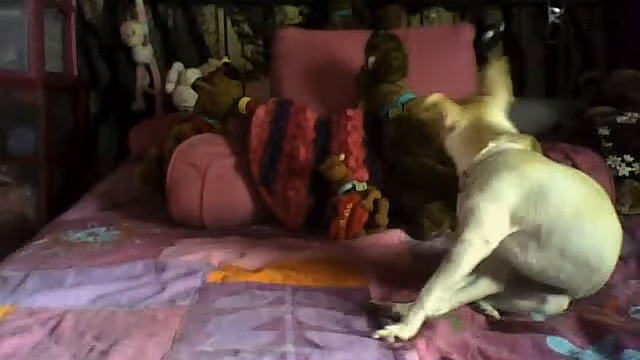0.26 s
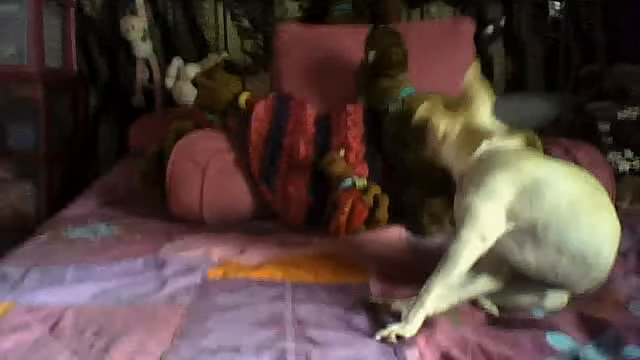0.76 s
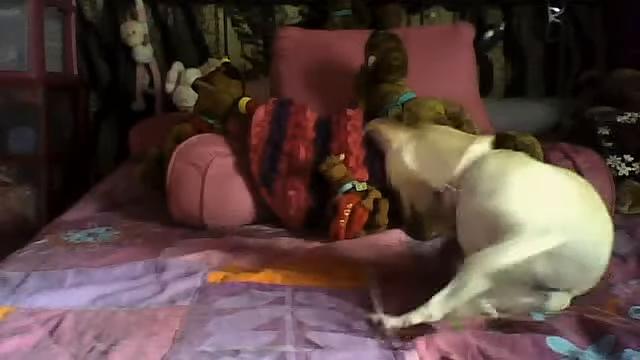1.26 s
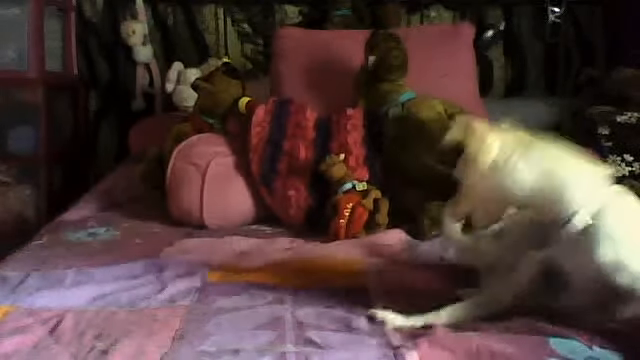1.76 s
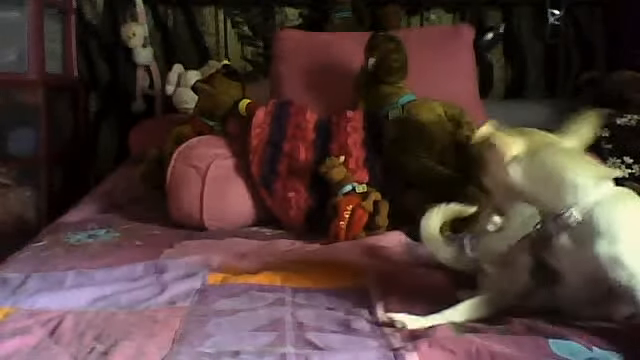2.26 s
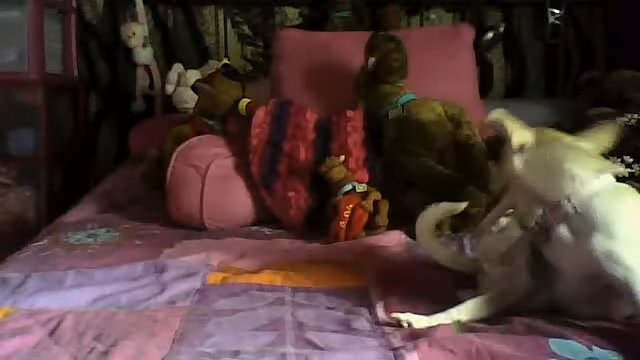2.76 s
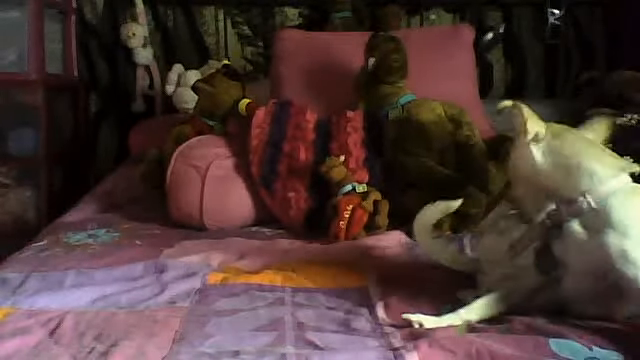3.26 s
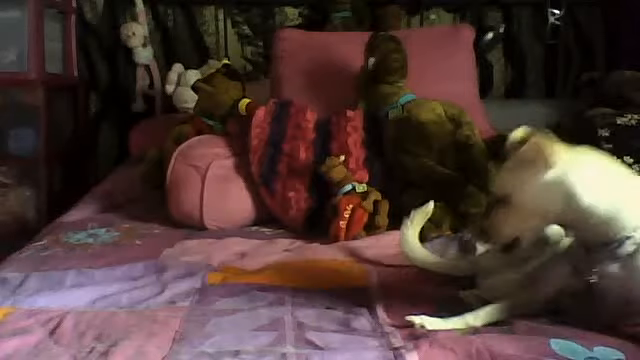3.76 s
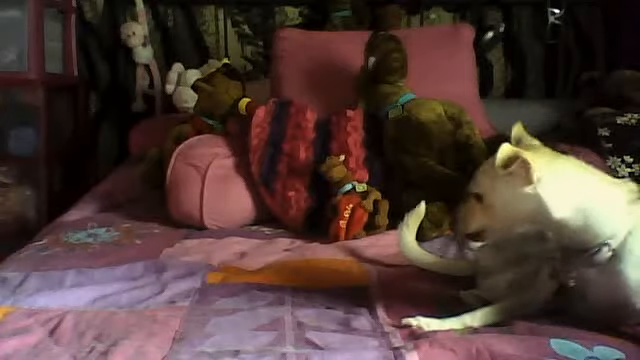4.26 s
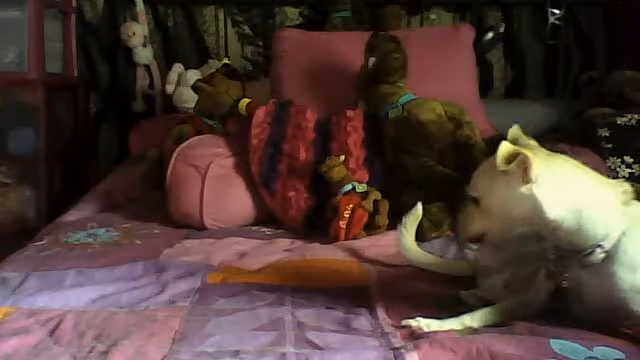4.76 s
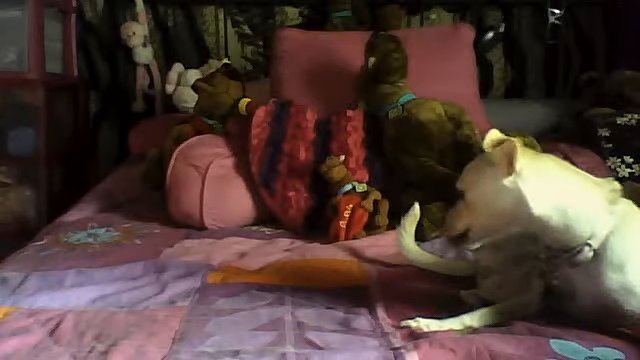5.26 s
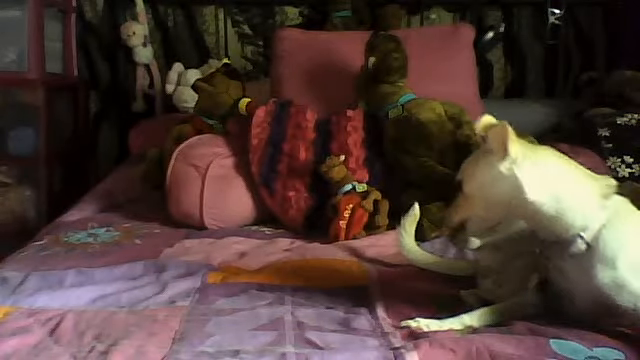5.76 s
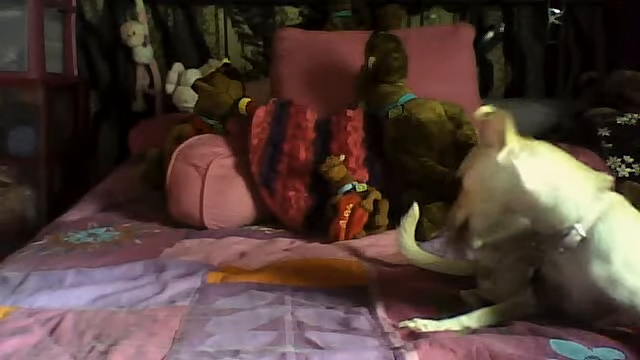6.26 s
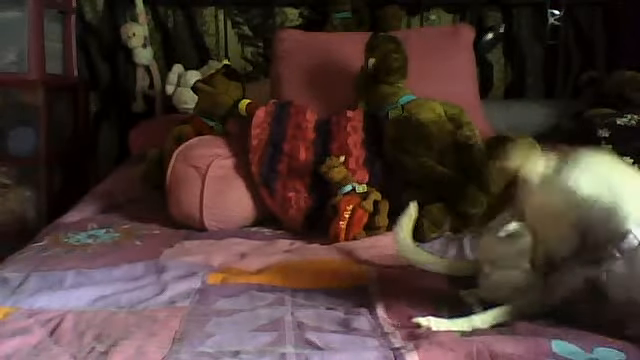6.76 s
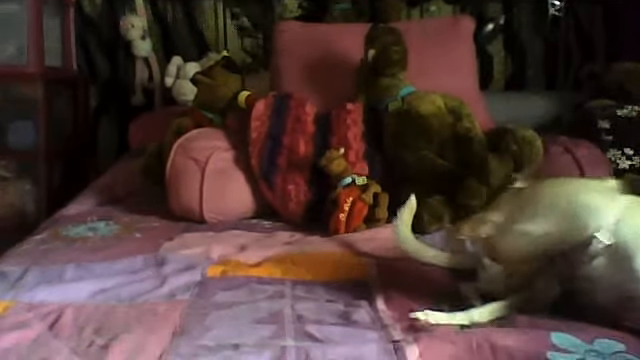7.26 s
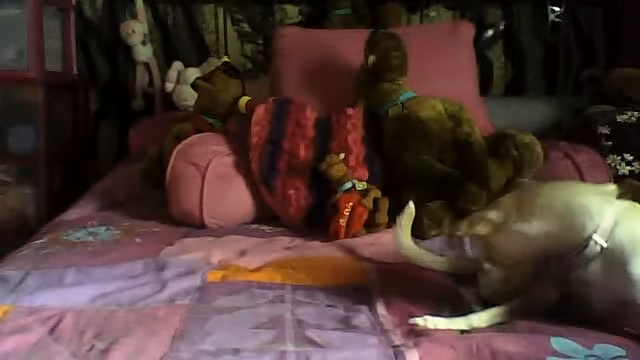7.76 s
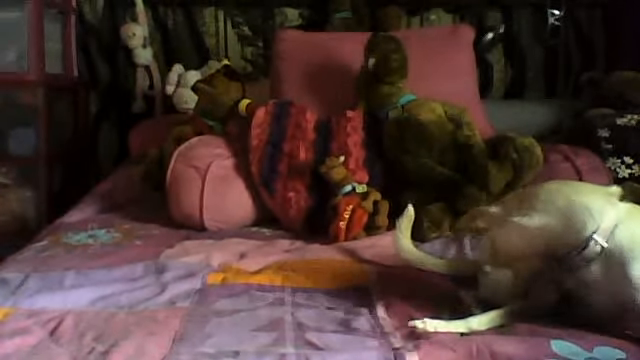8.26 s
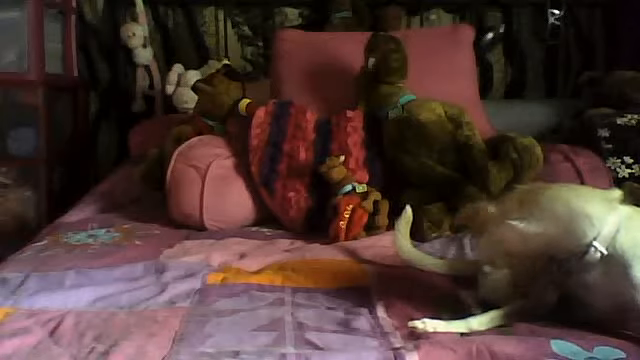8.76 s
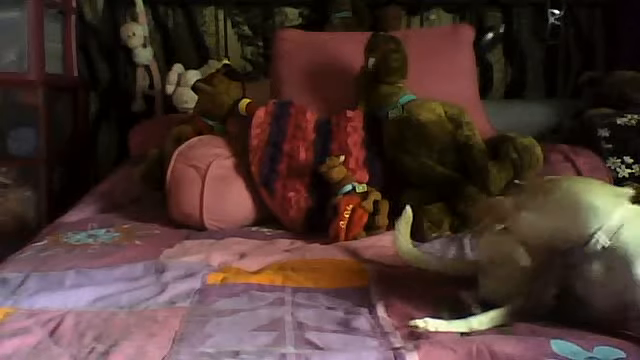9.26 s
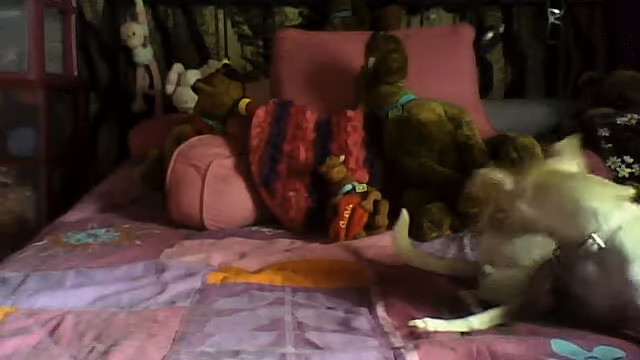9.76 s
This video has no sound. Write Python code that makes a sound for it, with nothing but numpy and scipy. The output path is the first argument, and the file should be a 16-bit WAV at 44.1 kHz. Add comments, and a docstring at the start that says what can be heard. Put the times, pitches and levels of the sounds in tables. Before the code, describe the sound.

Two mouse clicks, each a sharp press and a softer release, knock through a desk into the microphone. A computer's low hum and fluttering fan whine carry on indoors, along with hiss, static ticks and quick little bursts of electrical crackle. Very faint, muffled thuds come and go as a dog moves on a bed. A third click comes past the middle, and the computer runs on.

```python
"""From the start a computer sounds over the hiss and rumble at its desk microphone: its disk hums, its fan
whines, and data packets crackle in the microphone lead, about seven a second, among ticks of static.
In the first second and a half, two mouse clicks, press and release, knock through the desk top.
Then a dog shifts about almost silently on a bed, on and off until the end.
Near seven seconds comes a third click. The computer, the loud thing in the room, runs on."""
import sys
import numpy as np
from scipy import signal
from scipy.fft import rfft, irfft
from scipy.io import wavfile

SR = 44100
rng = np.random.default_rng(int(sys.argv[2]) if len(sys.argv) > 2 else 0)


def dump(signal):
    """Clip the signal to [-1, 1] and save it as 16-bit WAV at the path in sys.argv[1]."""
    limited = np.clip(np.atleast_2d(signal).T, -1, 1)
    pcm = np.round(limited * 32767).astype(np.int16)
    wavfile.write(sys.argv[1], SR, pcm)


N = 441000
TIME, FREQS = np.arange(N) / SR, np.fft.rfftfreq(N, 1 / SR)

# microphone hiss and room air: (frequency [Hz], spectral density [dB per Hz])
HISS_SPECTRUM = [(50, -62), (90, -65.5), (140, -70), (200, -76.5), (350, -82.5), (750, -86), (1300, -84.5),
                 (2000, -87.5), (4500, -89), (7700, -90), (9200, -91.5), (10300, -92.5)]
# swell of the air rumble: (time [s], relative level [dB])
RUMBLE_SWELL = [(0, -36.5), (.44, -34.5), (.58, -25.5), (.97, -35), (1.25, -25), (1.5, -36.5), (2.6, -32.5),
                (4.5, -34.5), (6.2, -35), (6.7, -33), (7.4, -37.5), (8.2, -30.5), (10, -39.5)]
# colour of the rumble: (frequency [Hz], gain [dB])
RUMBLE_SPECTRUM = [(3, -1.5), (16, 4), (29, -25.5), (50, -25), (90, -35.5), (200, -54), (1000, -100)]
# the dog's weight on the mattress: (centre time [s], length [s], level [dB], pitch [Hz])
DOG_NUDGES = [(1.766, 0.066, -39.5, 124), (2.215, 0.047, -40.5, 188), (2.443, 0.098, -46, 207),
              (3.597, 0.083, -37, 139), (4.696, 0.17, -50, 175), (4.92, 0.056, -43.5, 170),
              (6.258, 0.12, -47, 130), (7.27, 0.18, -48, 190), (7.89, 0.042, -46, 168),
              (8.305, .3, -57, 160), (8.69, 0.093, -47, 130), (9.476, 0.43, -49, 133),
              (9.917, 0.22, -51, 127)]
# ticks of static: (time [s], level [dB])
STATIC_TICKS = [(0.7776, -16), (1.1545, -14.5), (2.4568, -11.5), (3.0625, -6.5), (4.2561, -6.5),
                (5.69, -12.5), (6.8602, -12), (7.2521, -6), (7.7024, -4.5), (9.3587, -13)]
# mouse button, sharp press then soft release: (time [s], gain [dB], cutoff [Hz], bare switch click [dB])
BUTTON_SNAPS = [(0.2215, -1, 3700, -14), (0.3976, 1, 1430, -23), (1.2522, -1, 3670, -10),
                (1.4160, 1, 1390, -30), (6.964, 0, 3780, -11.5), (7.1479, 1, 1540, -29)]
# resonances of the desk and microphone stand: (frequency [Hz], width [Hz], gain [dB])
DESK_MODES = [(81, 20, 22), (118, 15.6, 31), (141.4, 26, 29.5), (188, 79, 10.5), (248, 31, 22),
              (312, 15, 20.5), (390, 96, 16.5), (525, 63, 26.5), (710, 55, 18), (916, 52, 19),
              (1265, 194, 17.5), (1805, 200, 14.5), (2384, 180, 15), (3300, 770, 9)]
# travel time of a knock through the desk: (frequency [Hz], group delay [s])
DESK_DELAY = [(60, 0.00844), (140, 0.00725), (300, .005), (540, .0045), (750, 0.0032), (1200, 0.00054),
              (2300, 0.0026), (3200, 0.0011), (6000, 0.0032)]
# long data packets, all at one voltage, so the longer sounds the louder: (time [s], length [s])
LONG_PACKETS = [(0.007, 0.0075), (0.155, 0.0061), (0.451, 0.0042), (0.57, 0.0045), (0.836, 0.014),
                (0.89, 0.006), (0.907, 0.0051), (0.967, 0.0041), (1.126, 0.0056), (1.344, 0.0119),
                (1.601, 0.0041), (1.88, 0.0046), (2.03, 0.0113), (2.148, 0.004), (2.403, 0.0055),
                (2.554, 0.0053), (2.828, 0.0105), (3.116, 0.0037), (3.416, 0.0091), (3.735, 0.0069),
                (3.864, 0.0096), (4.014, 0.0035), (4.299, 0.0075), (4.566, 0.0049), (4.699, 0.01),
                (5.086, 0.0068), (5.304, 0.0105), (5.611, 0.0044), (5.707, 0.0048), (5.85, 0.0096),
                (5.984, 0.0058), (6.111, 0.0052), (6.245, 0.0084), (6.545, 0.0061), (6.763, 0.0059),
                (6.907, 0.0163), (7.339, 0.0057), (7.465, 0.0074), (7.572, 0.006), (7.862, 0.006),
                (8.142, 0.01), (8.236, 0.0063), (8.376, 0.006), (8.543, 0.0078), (8.689, 0.0052),
                (9.103, 0.0067), (9.319, 0.0054), (9.479, 0.0032), (9.632, 0.0105), (9.768, 0.0054),
                (9.958, 0.0032)]
# colour of the interference: (frequency [Hz], gain [dB])
INTERFERENCE_SPECTRUM = [(100, 11), (400, 3), (1000, 1), (2000, -4.5), (3000, 2.5), (3550, 0), (3800, -5),
                         (5100, -7.5), (5800, 1.5), (6900, 4.5), (7250, -4), (11000, -3.5)]
# hum of the spinning disk and the mains: (frequency [Hz], rms level [dB])
HUM_LINES = [(89.96, -37), (64, -71), (104.5, -53.5), (121.8, -58.5), (173, -70), (1270, -67.5)]
# tones of the fan: (frequency [Hz], rms pitch wander [Hz], relative level [dB])
FAN_LINES = [(899, 9.94, 1.5), (937, 6.9, -2.5), (955.5, 6.99, 1.5), (992, 24, -8.5), (1034, 8.98, -5),
             (1212, 30, -8.5)]
# response of the sound input: (frequency [Hz], gain [dB])
INPUT_RESPONSE = [(8000, 1), (9300, -2), (10600, -8), (11000, -29), (12000, -17)]


def gain_of(db):
    """Amplitude ratio: a factor of ten for every 20 dB."""
    return 10 ** (np.asarray(db) / 20)


def unit_rms(x):
    """Normalisation to a mean square of 1."""
    return x / np.sqrt(np.mean(x ** 2) + 1e-20)


def curve_at(points, f):
    """Interpolation of (frequency, value) points on a logarithmic frequency axis."""
    hz, value = np.transpose(points)
    return np.interp(np.log(f + 1), np.log(hz + 1), value)


def coloured(x, points):
    """Zero-phase filtering by a curve of (frequency [Hz], gain [dB])."""
    return irfft(rfft(x) * gain_of(curve_at(points, FREQS)), N)


def resonance(f, hz, width):
    """Lorentzian gain curve, 1 at its centre."""
    return 1 / (1 + ((f - hz) / (width * np.pi / 4)) ** 2)


def band_noise(hz, width):
    """White noise filtered by one resonance, rms 1."""
    return unit_rms(irfft(rfft(rng.standard_normal(N)) * resonance(FREQS, hz, width), N))


def add(mix, s, sound):
    """Superposition of a sound on the mix at time s."""
    part = mix[max(round(s * SR), 0):][:len(sound)]
    part += sound[:len(part)]


def noise_floor(rumble_db=8):
    """Stationary hiss lies over a deep air rumble under slow amplitude modulation."""
    hiss = coloured(rng.standard_normal(N) * np.sqrt(SR / 2), HISS_SPECTRUM)
    rumble = unit_rms(coloured(rng.standard_normal(N), RUMBLE_SPECTRUM))
    swell = gain_of(rumble_db + np.interp(TIME, *np.transpose(RUMBLE_SWELL)))
    return hiss + rumble * swell


def dog_on_mattress(width_hz=55, cloth_db=-8, cloth_hz=260, cloth_width_hz=200):
    """Soft forcing by the dog's weight gives low thuds; friction adds a little muffled rubbing."""
    cloth = gain_of(cloth_db) * band_noise(cloth_hz, cloth_width_hz)
    out = np.zeros(N)
    for s, length, db, hz in DOG_NUDGES:
        shove = gain_of(db) * np.exp(-(2 * (TIME - s) / length) ** 2)
        out += shove * (band_noise(hz, width_hz) + cloth)
    return out


def static(spike_db=-1, spike_s=0.00003, fizz_db=-29, fizz_s=0.016, crackle_per_s=40, crackle_db=-24):
    """Brief impulses are broadband: electrical spikes trail a short fizz over a fine Poisson crackle."""
    heights = gain_of(crackle_db + 3 * np.clip(rng.standard_normal(N), -2, 2))  # 3 dB spread
    out = heights * (rng.random(N) < crackle_per_s / SR)
    t = np.arange(SR // 30) / SR
    spike = gain_of(spike_db) * np.exp(-t / spike_s)
    for s, db in STATIC_TICKS:
        fizz = gain_of(fizz_db) * np.exp(-(t / fizz_s) ** 2) * rng.standard_normal(len(t))
        add(out, s, gain_of(db) * (fizz - spike))
    return out


def bedroom(x, wet_db=-11, t60_s=0.21, cutoff_hz=270):
    """Absorption by the bedding leaves only a short reverberation in the bass."""
    t = np.arange(SR // 3) / SR
    build_up = np.minimum(t * 50, 1) ** 2
    tail = rng.standard_normal(len(t)) * gain_of(-60 * t / t60_s) * build_up
    tail = signal.lfilter(*signal.butter(2, cutoff_hz, fs=SR), tail / np.linalg.norm(tail))
    return x + gain_of(wet_db) * signal.fftconvolve(x, tail)[:N]


def mouse_clicks(switch_db=-10, rebound_db=-13, rebound_s=0.0082, rebound_hz=2000, size=16384):
    """Dispersion: each snap rings the desk, whose bending waves bring treble first, so it chirps down."""
    f, out = np.fft.rfftfreq(size, 1 / SR), np.zeros(N)
    mode_power = sum((gain_of(db) * resonance(f, hz, width)) ** 2 for hz, width, db in DESK_MODES)
    desk = np.sqrt(mode_power + gain_of(switch_db) ** 2)
    direct = np.exp(-2j * np.pi * np.cumsum(curve_at(DESK_DELAY, f)) * f[1])
    # the far edge of the desk reflects a weaker chirp; its delay goes as 1 / sqrt(f)
    lag = 4 * np.pi * rebound_s * np.sqrt(f * rebound_hz)
    rebound = gain_of(rebound_db) * resonance(f, rebound_hz, width=2200) * np.exp(-1j * lag)
    for s, db, cutoff_hz, click_db in BUTTON_SNAPS:
        log_gain = np.log(desk / np.sqrt(1 + (f / cutoff_hz) ** 6) + gain_of(click_db))
        mirrored = np.r_[log_gain, log_gain[-2:0:-1]]
        # minimum phase: the desk rings only after the blow
        ringing = np.exp(np.conj(signal.hilbert(mirrored))[:len(f)])
        add(out, s, gain_of(db) * irfft(ringing * (direct + rebound))[:size // 2])
    return out


def packet_schedule(long_db=-33.5, short_db=-39, short_s=0.0025, beats_per_s=7.5, jitter_s=0.038):
    """Quasi-periodic traffic, short packets filling the pauses: (time [s], length [s], level [dB])."""
    rows = [(s, length, long_db) for s, length in LONG_PACKETS]
    starts = [s for s, _ in LONG_PACKETS] + [N / SR]
    for before, after in zip(starts, starts[1:]):
        count = max(round((after - before) * beats_per_s), 1)
        beats = np.linspace(before, after, count, endpoint=False)[1:]
        for s, (late, stretch) in zip(beats, rng.uniform(-1, 1, (16, 2))):
            rows.append((s + jitter_s * late, short_s * (1 + 0.5 * stretch), short_db))
    return rows


def data_interference(on_s=0.00022, off_s=0.00033, strays_per_s=24, stray_db=-30, stray_s=0.00013):
    """Crosstalk: the lead picks up a data line's random switching, in dense packets and lone pulses."""
    out = np.zeros(N)
    for s, length, db in packet_schedule():
        holds = rng.gamma(2, 1 / 2, (100, 2)) * [off_s, on_s]
        t = np.arange(0, max(length, 0.002), 1 / SR)
        state = np.searchsorted(np.cumsum(holds), t) % 2
        add(out, s, gain_of(db) * unit_rms(state - state.mean()))
    heights = gain_of(stray_db + 3 * rng.standard_normal(N))  # 3 dB spread
    strays = heights * (rng.random(N) < strays_per_s / SR)
    pulse = np.exp(-(np.arange(SR // 100) / SR / stray_s) ** 2)
    return coloured(out + np.convolve(strays, pulse)[:N], INTERFERENCE_SPECTRUM)


def fan_whine(level_db=-49.8, wander_rate_hz=22, flutter_hz=13, flutter_depth=0.9):
    """Beating: close tones wander and interfere; eddies now add to the whine, now cancel it."""
    whine = np.zeros(N)
    for hz, wander, db in FAN_LINES:
        pitch = hz + wander * band_noise(0, wander_rate_hz)
        whine += gain_of(db) * np.sin(2 * np.pi * np.cumsum(pitch) / SR)
    in_phase = 1 + flutter_depth * band_noise(0, flutter_hz)
    quadrature = flutter_depth * band_noise(0, flutter_hz)
    return gain_of(level_db) * unit_rms(np.hypot(in_phase, quadrature) * whine)


def disk_hum(waver_depth=0.045, waver_hz=7):
    """Periodic sources give a line spectrum: disk and mains hum, wavering slightly in level."""
    lines = sum(gain_of(db) * np.sin(2 * np.pi * (hz * TIME + rng.random())) for hz, db in HUM_LINES)
    return np.sqrt(2) * lines * (1 + waver_depth * band_noise(0, waver_hz))


def scene():
    """Superposition of all that reaches the one microphone and its lead."""
    background = noise_floor() + dog_on_mattress() + static()
    clicks = bedroom(mouse_clicks())
    computer = data_interference() + fan_whine() + disk_hum()
    return (background + clicks + computer)[None]


def record(dry):
    """Band limiting: the sound input rolls off the high treble and cuts it at 12 kHz."""
    lowpass = signal.firwin(401, 12000, window=("kaiser", 8), fs=SR)
    return signal.oaconvolve(coloured(dry, INPUT_RESPONSE), lowpass[None], "same")


dry = scene()
out = record(dry)
dump(out)
```